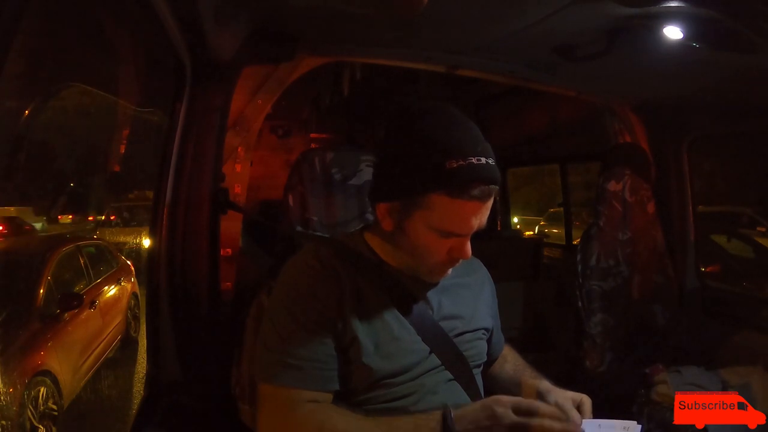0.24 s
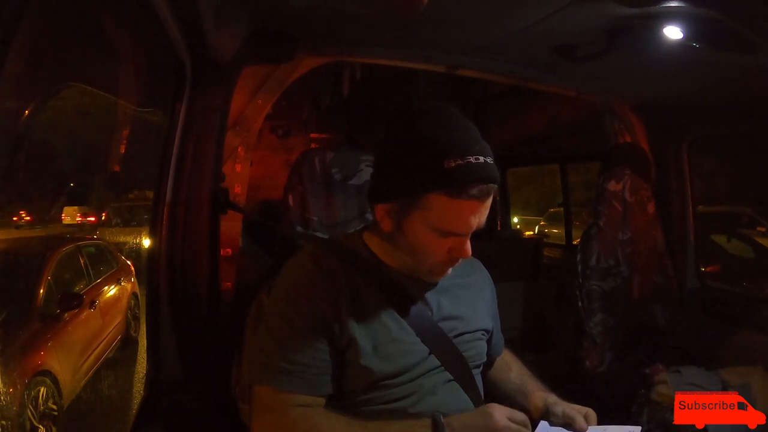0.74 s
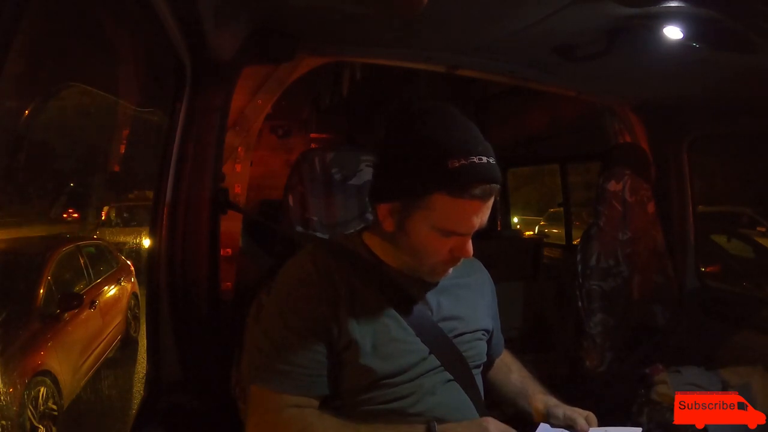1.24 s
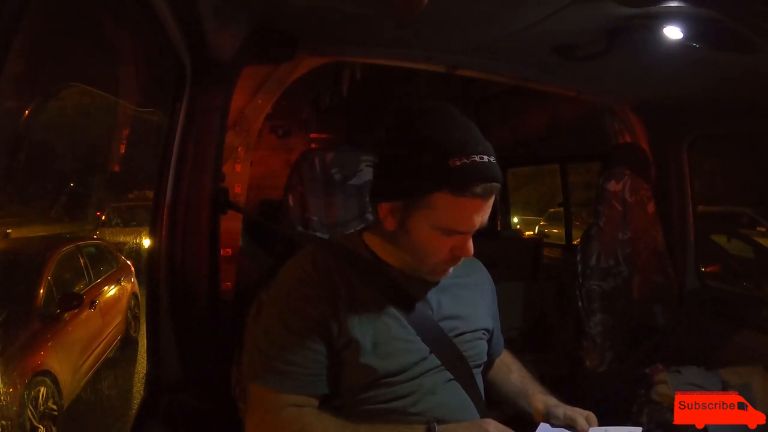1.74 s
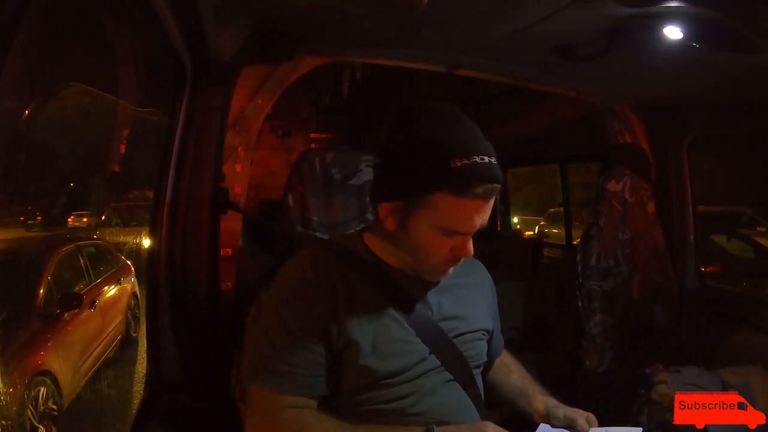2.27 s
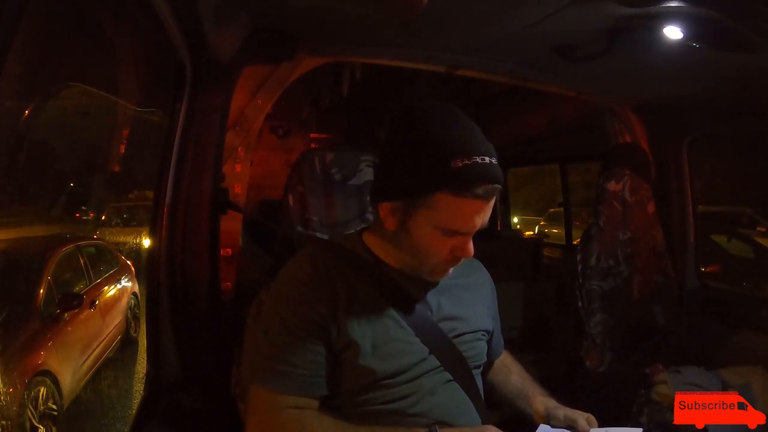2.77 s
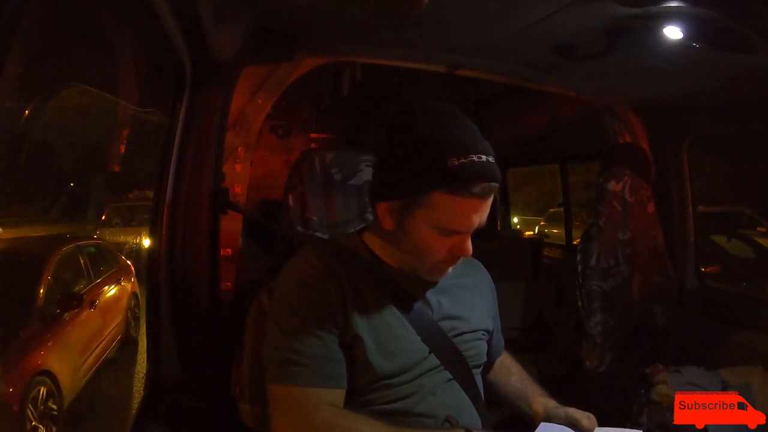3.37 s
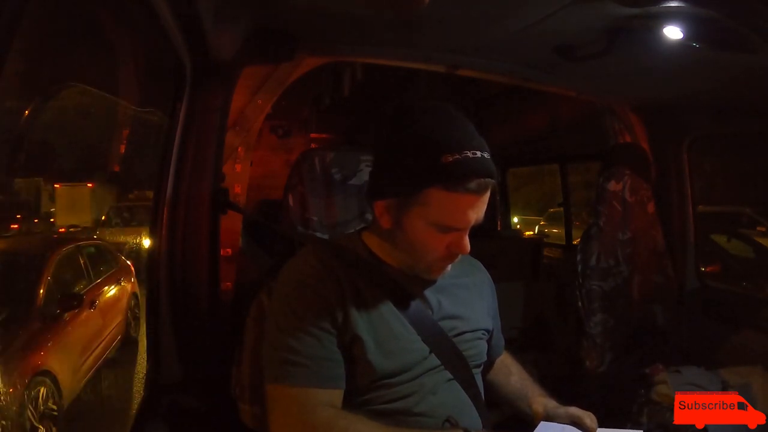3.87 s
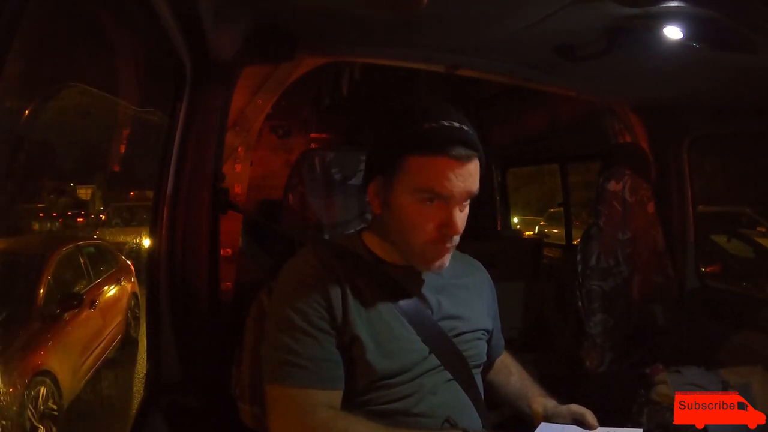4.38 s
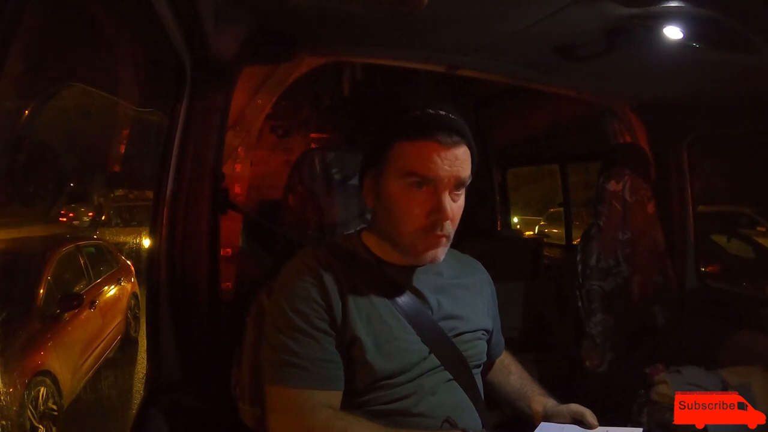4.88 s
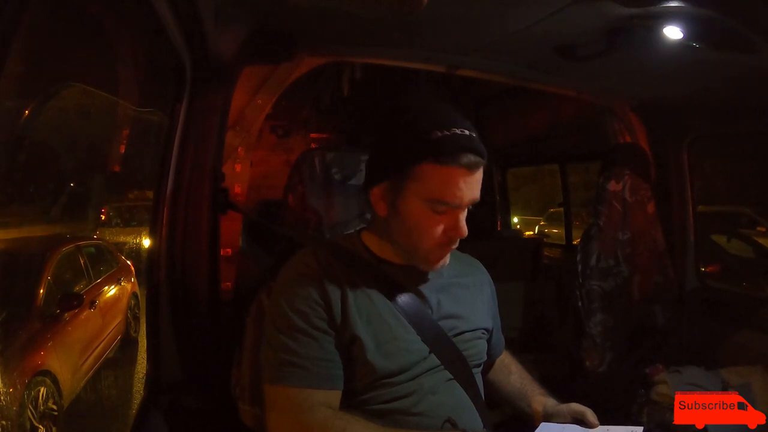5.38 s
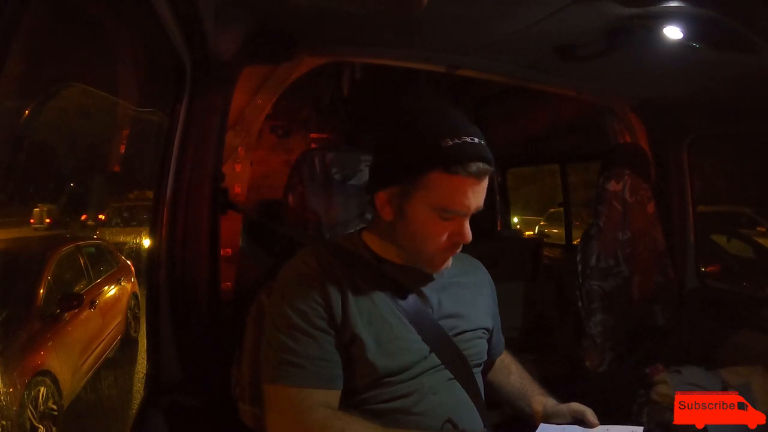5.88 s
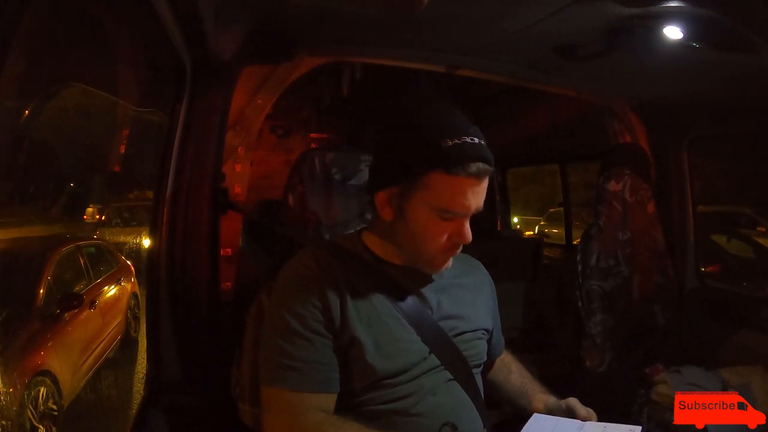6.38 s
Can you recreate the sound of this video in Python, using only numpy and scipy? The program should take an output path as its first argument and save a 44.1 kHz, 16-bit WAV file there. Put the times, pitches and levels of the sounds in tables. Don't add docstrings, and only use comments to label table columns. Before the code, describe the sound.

Heard by a microphone inside a closed van cab at night: soft low traffic rumble, faint diesel idle, and a paper sheet scratching and ticking at the start. A distant motorbike growl rises in low throttle swells, bursts past the window just after three seconds with ragged exhaust, hiss and buzzing panels, then burbles away in uneven blips and fades, leaving rumble and a light paper slide.

```python
import sys
import numpy as np
from scipy import signal
from scipy.fft import rfft, irfft, next_fast_len
from scipy.io import wavfile
from scipy.ndimage import uniform_filter1d, map_coordinates

SR = 44100
rng = np.random.default_rng(int(sys.argv[2]) if len(sys.argv) > 2 else 0)


def bounce(signal):
    frames = np.transpose(np.atleast_2d(signal))
    limited = np.clip(frames, -1, 1)
    pcm = np.round(limited * 32767).astype(np.int16)
    wavfile.write(sys.argv[1], SR, pcm)


def level_to_linear(level):
    exponent = np.asarray(level, float) / 20
    return 10 ** exponent


N = 291957

# [t/s, engine cycles f/Hz]
REVS_HZ = [(1.36, 40.98), (1.47, 46.26), (1.56, 47.44), (1.69, 55.67), (1.8, 48.02), (1.99, 40.93),
           (2.119, 44.84), (2.29, 56.43), (2.44, 48.98), (2.499, 41.58), (2.56, 45.2), (2.63, 43.53),
           (2.72, 54.7), (2.77, 58.06), (3.14, 33.27), (3.27, 39.57), (3.35, 35.52), (3.41, 41.74),
           (3.519, 42.67), (3.6, 36.96), (3.66, 38.17), (3.73, 43.38), (3.832, 46.25), (3.889, 48.5),
           (3.94, 49.16), (4.04, 41.9), (4.12, 37.62), (4.199, 35.82), (4.3, 36.6), (4.431, 37.26),
           (4.48, 38.15), (4.54, 40.2), (4.621, 40.47), (4.758, 43.18), (4.84, 40.43), (4.922, 41.38),
           (4.999, 44.7), (5.101, 39.29), (5.15, 40.4), (5.2, 43.4), (5.25, 45.9), (5.33, 45.05),
           (5.46, 40.84), (5.899, 34.02)]
# [t/s, closeness/dB]
NEAR_DB = [(0, -8), (.25, -15.5), (1, -28), (1.7, -14), (2.5, -9.5), (2.75, -5.5), (2.95, -6.5),
           (3.18, -3.5), (3.26, 1.5), (3.33, -2), (3.43, -0.5), (3.7, -8), (4.3, -10.5), (4.65, -5.5),
           (5.15, -8.5), (5.83, -19), (6.4, -8), (6.62, -9)]
# [start t/s, length/s, boom order 3/dB, bark order 5/dB, snarl order 8/dB]
NOTES_DB = [(.1, 0.64, -49.5, -47.5, -50), (.9, 0.573, -44.5, -42, -46), (1.41, 0.043, -30.5, -37, -50),
            (1.52, 0.61, -43, -35, -43), (2.17, 0.086, -45.5, -39.5, -55.5),
            (2.31, 0.14, -45, -29.5, -54.5), (2.5, 0.11, -23, -31.5, -45.5),
            (2.65, 0.067, -40.5, -23.5, -41), (2.8, 0.1, -30, -24, -45.5),
            (2.92, 0.18, -23.5, -33.5, -52.5), (3.285, 0.06, -15, -35.5, -46),
            (3.37, .03, -18.5, -32, -35.5), (3.47, 0.05, -16.5, -33.5, -39), (3.59, 0.089, -23, -33, -30.5),
            (3.68, 0.027, -37, -36.5, -29.5), (3.745, 0.044, -28.5, -23, -31.5),
            (3.8, 0.042, -27, -35.5, -29), (3.86, .12, -27, -21, -28.5), (4.03, .05, -50, -42, -36),
            (4.11, .03, -47.5, -43, -37), (4.17, 0.13, -44.5, -29, -39), (4.33, 0.12, -43, -31.5, -37.5),
            (4.47, 0.067, -29.5, -34, -34.5), (4.59, 0.094, -33.5, -35, -35.5),
            (4.7, .05, -29.5, -36, -37.5), (4.77, .04, -29, -46, -41), (4.84, 0.079, -33.5, -50.5, -34),
            (4.94, .1, -27.5, -45.5, -34.5), (5.1, 0.12, -37.5, -47, -36.5), (5.22, 0.11, -34.5, -32, -50),
            (5.41, 0.042, -34, -51, -47), (5.5, 0.15, -41.5, -45, -45), (5.65, 0.28, -52.5, -46, -51)]
# [start t/s, length/s, order 11/dB, order 16/dB]
EDGES_DB = [(3.56, 0.13, -31.5, -57.5), (3.76, 0.06, -33.5, -36.5), (3.85, 0.11, -39, -58),
            (4.0, 0.06, -47, -56.5), (4.13, 0.092, -35, -48), (4.28, 0.19, -35.5, -43.5),
            (4.53, 0.11, -37.5, -45), (4.7, 0.15, -43, -57), (4.86, 0.14, -44, -50), (5.13, 0.04, -46, -48),
            (5.2, 0.14, -44.5, -60)]
NOTE_ATTACK_S, NOTE_RELEASE_S = 0.053, 0.06
# [start t/s, length/s, ragged exhaust/dB, rasp/dB]
SNAPS_DB = [(2.15, 0.072, -39.5, -58), (2.46, .07, -30, -51.5), (2.64, .1, -30, -49),
            (3.19, .07, -29.5, -69), (3.35, .11, -20, -49), (3.49, 0.11, -25, -47), (3.64, .08, -20, -47.5),
            (3.76, 0.055, -33.5, -41), (3.86, .13, -33, -47.5), (4.1, 0.07, -41, -60), (4.2, .45, -43, -63),
            (4.7, 0.06, -34, -64), (4.96, .08, -39.5, -58), (5.08, .27, -36.5, -59)]
SNAP_ATTACK_S, SNAP_RELEASE_S = 0.034, 0.055
WEAK_ORDERS = [6, 7, 9, 10, 4, 12, 13, 14, 18, 19, 21, 24, 26, 27, 29]
WEAK_ORDERS_DB = [-11.5, -3.5, -4.5, -12, -13, -9, 0.5, -11, -9.5, -4.5, 2.5, 12, 4.5, 1, 2]
FIRST_DB, SECOND_DB = -1, -21
CALM, WILD = 0.38, 1.1
WAVER_DB = 0.6
PASSED_S, TURN_S, SHADOW_DB = 3.6, 0.146, -7

# [f/Hz, width/Hz, level/dB]
CAB_MODES = [(53, 7.1, -3.5), (116, 53, -1), (226, 91.7, 0), (397, 87, -1), (647, 137, -17),
             (1220, 200, -33)]
# [f/Hz, width/Hz, level/dB]
CAN_MODES = [(705, 39, 3.5), (847, 61, -0.5), (1093, 110, -1.5), (1500, 48, -6), (1540, 110, -14.5),
             (2100, 38, -20.5)]
# [f/Hz, width/Hz, level/dB]
METAL_MODES = [(2100, 300, -14), (3370, 300, -8), (3690, 300, -6), (4090, 230, 2), (4640, 260, -4)]
# [f/Hz, width/Hz, level/dB]
TAILPIPE_MODES = [(2050, 35, 3), (2820, 900, -2.5)]
# [f/Hz, level/dB]
GLASS_DB = [(10, 15.5), (1200, -10.5), (2500, -26.5), (5000, -38), (20000, -80)]
# [f/Hz, level/dB]
SHIELD_DB = [(10, 6.5), (4900, -3.5), (6000, -6.5), (8000, -26), (13000, -33.5), (20000, -68)]
# [t/s, level/dB]
WHIRR_DB = [(0, -73), (.25, -73), (1, -74.5), (1.7, -69.5), (2.3, -68), (2.55, -65), (2.73, -55.5),
            (2.95, -66.5), (3.2, -57), (3.28, -61), (3.36, -65), (3.7, -66), (3.95, -65.5), (4.3, -66.5),
            (4.65, -66), (5.15, -64.5), (5.83, -72.5), (6.4, -65.5), (6.62, -69)]
CHAIN_DB, CHAIN_GROWS = -57, 1.19
TAILPIPE_DB = -32
# [start t/s, length/s, f/Hz, level/dB]
BUZZES_DB = [(2.6, 0.22, 3350, -64.5), (3.45, .25, 1900, -68), (4.15, .35, 2080, -74.5),
             (2.8, 0.094, 3700, -66.5), (2.979, 0.17, 3600, -65.5), (3.15, 0.1, 3680, -64.5),
             (3.235, .03, 3400, -60), (3.2, .07, 4100, -59.5), (2.9, .3, 4600, -70), (4.57, .07, 3700, -67),
             (5.7, .1, 4090, -68), (3.358, 0.085, 4100, -59.5), (3.42, .12, 2550, -62),
             (3.76, 0.15, 2050, -66), (3.94, 0.18, 2070, -67), (3.86, 0.14, 3680, -64.5),
             (4.0, .25, 2720, -68.5)]
BUZZ_WIDTH_HZ = 29

# [t/s, level/dB, f/Hz, length/s]
THUDS_DB = [(.14, -34.5, 52, 0.14), (0.278, -35, 55, .09), (.4, -39, 52, .1), (.33, -35, 275, .05),
            (0.416, -40, 250, .12), (0.628, -37, 125, .05), (0.781, -35.5, 125, .06),
            (1.018, -38.5, 210, .08), (1.071, -36.5, 55, .07), (1.252, -36.5, 285, .1),
            (3.17, -30, 185, .06), (3.271, -33, 52, .16), (3.382, -21.5, 208, .05), (3.53, -34, 52, .1),
            (3.95, -37, 50, .12), (4.76, -42, 52, .1), (5.55, -38.5, 53, .12), (5.734, -37, 53, .1),
            (6.358, -32.5, 125, .06), (1.68, -34.5, 53, 0.12), (2.2, -30.5, 116, 0.092),
            (2.72, -30, 53.9, 0.27), (2.623, -24, 133.1, 0.094), (3.053, -31, 260, 0.073),
            (3.557, -15, 122.6, 0.045), (5.052, -31, 216.6, .06), (5.416, -31, 128.4, .08),
            (6.521, -34, 125, 0.22), (2.18, -32, 260, 0.046), (2.291, -30, 82, 0.065),
            (3.045, -34, 53.17, 0.07), (3.42, -27, 50.82, 0.09), (3.557, -16, 244, 0.04),
            (3.604, -22, 235, 0.032), (3.6, -27.5, 469, .05), (3.66, -31.5, 579, .06),
            (3.698, -31, 316, .06), (6.153, -37, 141.3, 0.09)]
# [f/Hz, density/dB per Hz]
HISS_DB = [(1500, -8.5), (2700, -0.5), (3800, 0.5), (5000, -4.5), (6500, -17), (8000, -23), (11000, -27.5),
           (13000, -46.5)]
WHOOSH_DB, WHOOSH_GROWS = -52, 1.53

# [t/s, peak/dB, f/Hz, edge/dB]
TICKS_DB = [(0.0911, -45, 2150, -10.5), (0.541, -55.5, 2920, -3.5), (0.548, -56, 3500, -14),
            (4.06, -74, 7400, -8), (4.07, -76, 11000, -6.5), (4.076, -70.5, 7600, -12),
            (4.087, -74, 7700, -11), (4.115, -73, 7700, -9), (6.489, -49, 2780, -12),
            (6.562, -51, 4070, -36), (6.572, -58, 4040, -36)]
# [start t/s, length/s, hiss/dB]
STROKES_DB = [(.0, .06, -72), (.06, 0.084, -64), (.16, 0.063, -61.5), (.26, 0.14, -78), (.43, .06, -82),
              (.545, .012, -74), (3.04, .08, -69), (3.25, .04, -66), (3.37, .05, -70), (3.5, 0.09, -81),
              (4.075, 0.015, -80), (6.1, 0.48, -75.5), (6.28, 0.062, -82), (6.47, 0.04, -72)]
# [f/Hz, density/dB per Hz]
PAPER_DB = [(1500, -13.5), (2200, -5), (4500, -2.5), (6300, -7), (7400, -7), (8500, -11), (10000, -14),
            (11000, -10), (12200, -18.5), (13300, -33.5), (16000, -36)]
STROKE_ATTACK_S, STROKE_RELEASE_S = 0.064, 0.02

IDLE_HZ = 13.3
# [crank order, level/dB]
IDLE_DB = [(2, -66.5), (4, -48.5), (6, -51.5), (8, -52), (10, -43), (12, -63.5), (14, -53.5), (16, -56.5),
           (20, -54), (22, -51.5), (25, -54), (32, -53.5)]

# [t/s, level/dB]
ROAD_DB = [(0, -34.5), (1, -29), (2, -30), (3, -24.5), (3.8, -31.5), (4.3, -37), (5.3, -30.5),
           (6.62, -27.5)]
# [f/Hz, density/dB per Hz]
RUMBLE_DB = [(12, -40.5), (20, -5.5), (125, 3), (223, 2), (278, 1), (404, -4), (490, -16.5), (586, -15.5),
             (700, -31), (910, -47.5), (1540, -120)]
# [t/s, roar/dB]
FAR_DB = [(0, -41.5), (.4, -43), (3, -45), (5.6, -44), (6.62, -41)]
# [f/Hz, density/dB per Hz]
ROAR_DB = [(300, -4), (450, -5), (600, -3), (860, -6.5), (1400, -15.5), (1930, -26), (2680, -27.5),
           (4500, -41), (5500, -45.5), (7000, -53), (9000, -67), (13000, -84.5)]


def bike():
    cycle_hz = revs()
    notes = held(NOTES_DB, NOTE_ATTACK_S, NOTE_RELEASE_S)
    boom, bark, snarl = notes
    load, scrape = held(SNAPS_DB, SNAP_ATTACK_S, SNAP_RELEASE_S)
    strain = np.clip(2 * load / (load + boom + bark + 1e-4), 0, 1)
    rough = CALM + (WILD - CALM) * strain ** 2
    jitter = 0.012 * rough * wobble(30) + 0.002 * wobble(8)
    turn = np.cumsum(cycle_hz * (1 + jitter)) / SR

    fired = np.diff(np.floor(turn) + np.floor(turn - 3 / 8), prepend=-1) > 0
    blasts = fired * level_to_linear(2 * rng.standard_normal(N))
    pressure = signal.lfilter([1], [1, -np.exp(-1 / (0.027 * SR))], blasts)

    tone = exhaust_tone(turn, cycle_hz, notes, rough)
    ragged, rasp = exhaust_blasts(blasts, pressure, rough)
    return tone + buzzes() + load * ragged + scrape * rasp + valve_gear(pressure, snarl)


def revs():
    s, hz = np.transpose(REVS_HZ)
    t = np.arange(N) / SR
    climb = np.interp(t, s, hz)
    sag = 1 / np.interp(t, s, 1 / hz)
    return np.where(np.gradient(climb) < 0, sag, climb)


def exhaust_tone(turn, cycle_hz, notes, rough):
    def order(k, db):
        depth_db = np.minimum(1, 0.3 + k / 14) * (WAVER_DB + 3 * rough[::64])
        sine = np.sin(2 * np.pi * (k * turn + rng.random()))
        return level_to_linear(db) * wobble(14, depth_db) * np.sqrt(2) * sine

    grid_hz = np.arange(1, 1500)
    cab_gain = np.abs(modes(CAB_MODES)(grid_hz))

    def cab(hz):
        return np.interp(hz, grid_hz, cab_gain)

    boom, bark, snarl = notes
    bite, sheen = held(EDGES_DB, NOTE_ATTACK_S, NOTE_RELEASE_S)
    tone = boom * order(3, 0) + bark * order(5, 0) + snarl * order(8, 0)
    tone += bite * order(11, 0) + sheen * order(16, 0)
    for k, db in zip(WEAK_ORDERS, WEAK_ORDERS_DB):
        tone += snarl * cab(k * cycle_hz) * order(k, db)
    mean = uniform_filter1d(np.maximum(boom, bark), size=SR // 5)
    tone += mean * cab(cycle_hz) ** 2 * order(1, FIRST_DB)
    tone += mean * cab(2 * cycle_hz) * order(2, SECOND_DB)
    return tone


def exhaust_blasts(blasts, pressure, rough):
    def muffled(hz):
        return modes(CAB_MODES[1:])(hz) * shape(GLASS_DB)(hz) * (1 + 1j * hz / 300)

    def canned(hz):
        return modes(CAN_MODES)(hz) * shape(GLASS_DB)(hz / 2)

    puff = unit(pressure * rng.standard_normal(N))
    ragged = unit(filtered(unit(blasts) + 2.3 * puff, muffled))
    rasp = unit(filtered(unit(blasts) + 1.2 * rough * puff, canned))
    return ragged, rasp


def valve_gear(pressure, snarl):
    def metal(part):
        return rush(lambda hz: modes(part)(hz) * shape(SHIELD_DB)(hz), patchy_db=1.1)

    def whine(part):
        return rush(lambda hz: modes(part)(hz) ** 2, patchy_db=1.2)

    near_db, = curves(NEAR_DB)
    whirr_db, = curves(WHIRR_DB)
    upper = level_to_linear(-5.0 + 0.44 * shadow()) * whine(METAL_MODES[4:])
    parts = level_to_linear(whirr_db) * (whine(METAL_MODES[3:4]) + upper)
    parts += level_to_linear(CHAIN_DB + CHAIN_GROWS * near_db) * metal(METAL_MODES[:3])
    parts += level_to_linear(TAILPIPE_DB) * shadow() / SHADOW_DB * snarl * metal(TAILPIPE_MODES)
    return unit(1 + 0.69 * unit(pressure)) * parts


def shadow():
    return SHADOW_DB * np.clip((np.arange(N) / SR - PASSED_S) / TURN_S, 0, 1)


def buzzes():
    out = np.zeros(N)
    for s, length, hz, db in BUZZES_DB:
        t = np.arange(round((length + 0.1) * SR)) / SR
        pole = np.exp(-np.pi * BUZZ_WIDTH_HZ / SR + 2j * np.pi * hz / SR)
        ring = unit(signal.lfilter([1], [1, -pole], rng.standard_normal(SR // 2)).real)[:len(t)]
        swell = np.sqrt(np.sin(np.pi * t / t[-1]).clip(0))
        out[round((s - 0.05) * SR):][:len(t)] += level_to_linear(db) * ring * swell
    return out


def thuds():
    t = np.arange(N) / SR
    out = np.zeros(N)
    for s, db, hz, length in THUDS_DB:
        swell = np.exp(-(2 * (t - s) / length) ** 2)
        out += level_to_linear(db) * np.sqrt(2) * swell * np.cos(2 * np.pi * hz * (t - s))
    return out


def whoosh():
    near_db, = curves(NEAR_DB)
    return level_to_linear(WHOOSH_DB + WHOOSH_GROWS * near_db + shadow()) * rush(shape(HISS_DB), patchy_db=0.5)


def paper():
    level, = held(STROKES_DB, STROKE_ATTACK_S, STROKE_RELEASE_S)
    out = level * level_to_linear(0.6 * wobble(55)) * rush(shape(PAPER_DB), patchy_db=1.5)
    t = np.arange(SR // 30) / SR
    snap = signal.butter(3, [1800, 8000], "band", fs=SR)
    for s, db, hz, edge_db in TICKS_DB:
        ring = (1 - np.exp(-t / 0.00021)) * level_to_linear(-60 * t / 0.0096) * np.sin(2 * np.pi * hz * t)
        noise = signal.lfilter(*snap, rng.standard_normal(len(t)))
        edge = level_to_linear(edge_db - 2.0 - 60 * t / 0.046) * noise
        start = round(s * SR)
        out[start:][:len(t)] += level_to_linear(db + 11.5) * (ring + edge)[:N - start]
    return out


def van():
    turn = np.cumsum(IDLE_HZ * (1 + 0.004104 * wobble(3.027))) / SR
    out = np.zeros(N)
    for k, db in IDLE_DB:
        sine = np.sin(2 * np.pi * (k * turn + rng.random()))
        out += level_to_linear(db) * wobble(7.1, depth_db=4.5) * np.sqrt(2) * sine
    return out


def road():
    rumble_db, = curves(ROAD_DB)
    far_db, = curves(FAR_DB)
    swell = wobble(2.7)
    rumble_gain = level_to_linear(rumble_db - 5.0 + 0.26 * swell + 0.37 * wobble(14.0))
    rumble = rumble_gain * rush(shape(RUMBLE_DB), patchy_db=-0.5)
    return rumble + level_to_linear(far_db + 0.5 * swell) * rush(shape(ROAR_DB), patchy_db=0.73)


def unit(x):
    return x / np.sqrt(np.mean(x ** 2) + 1e-20)


def curves(rows):
    s, *cols = np.transpose(rows)
    return [np.interp(np.arange(N) / SR, s, c) for c in cols]


def held(rows, attack_s, release_s):
    t = np.arange(0, N + 64, 64) / SR
    s, length, *cols = np.transpose(rows)[:, :, None]
    rise = np.clip((t - s) / attack_s + 0.5, 0, 1)
    form = rise * np.exp(-np.clip(t - s - length, 0, None) / release_s * 2)
    return [np.interp(np.arange(N) / SR, t, (level_to_linear(db) * form).sum(axis=0)) for db in cols]


def wobble(rate_hz, depth_db=None):
    coarse = np.arange(0, N + 64, 64)
    knots = rng.standard_normal(int(N * rate_hz / SR) + 4)
    smooth = map_coordinates(knots, [coarse * rate_hz / SR])
    if depth_db is not None:
        smooth = level_to_linear(smooth * np.resize(depth_db, len(coarse)))
    return np.interp(np.arange(N), coarse, smooth)


def filtered(x, response):
    m = next_fast_len(N + SR // 2)
    return irfft(rfft(x, m) * response(np.fft.rfftfreq(m, 1 / SR)), m)[:N]


def shape(points):
    f, db = np.transpose(points)
    return lambda hz: level_to_linear(np.interp(np.log(hz + 1), np.log(f), db, -120, -120))


def modes(rows):
    def response(f):
        total = 0
        for k, (c, w, db) in enumerate(rows):
            total = total + (-1) ** k * level_to_linear(db) * 1j * f * w / (c * c - f * f + 1j * f * w)
        return total
    return response


def rush(response, patchy_db):
    z = signal.stft(rng.standard_normal(N + 512), nperseg=512)[2]
    field = uniform_filter1d(rng.standard_normal(z.shape), size=6, axis=0)
    field = uniform_filter1d(field, size=14, axis=1)
    noise = signal.istft(z * level_to_linear(patchy_db * unit(field)), nperseg=512)[1][:N]
    return unit(filtered(noise, response))


def scene():
    return (bike() + thuds() + whoosh() + paper() + van() + road())[None]


def low_pass(x):
    return signal.sosfilt(signal.butter(12, 13300, fs=SR, output="sos"), x)


def record(dry):
    hz, _, z = signal.stft(dry[0], SR, nperseg=1024, boundary="odd")
    band = uniform_filter1d(np.abs(z) ** 2, size=12, axis=0)
    band = uniform_filter1d(band, size=2, axis=1)
    flicker = uniform_filter1d(rng.standard_normal(z.shape), size=16, axis=0)
    flicker = uniform_filter1d(flicker, size=3, axis=1)
    threshold_db = -113 + 2.4 * unit(flicker)
    kept = (band > level_to_linear(2 * threshold_db)) | (hz[:, None] < 7000)
    gated = signal.istft(z * kept, SR, nperseg=1024)[1][None, :N]
    return low_pass(gated)


dry = scene()
out = record(dry)
bounce(out)
```